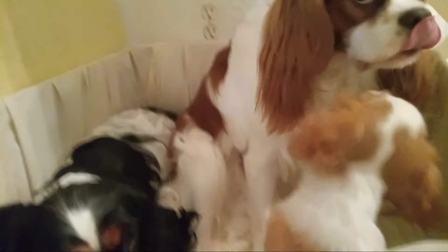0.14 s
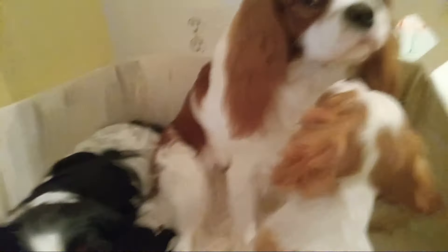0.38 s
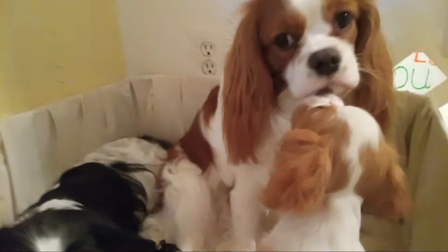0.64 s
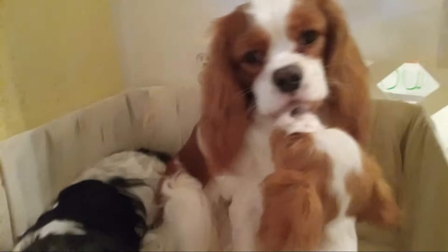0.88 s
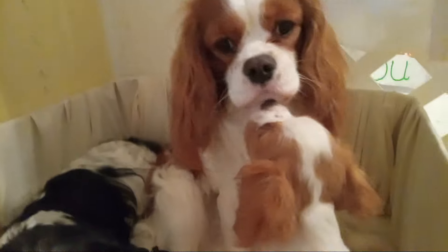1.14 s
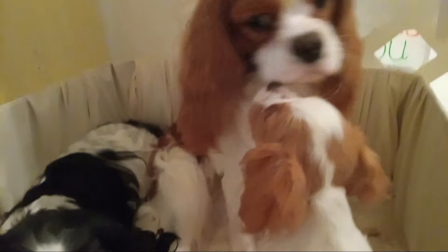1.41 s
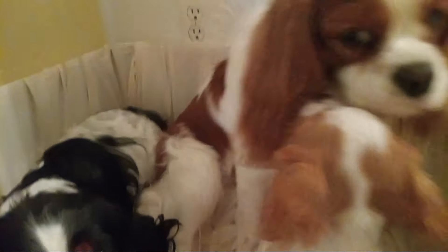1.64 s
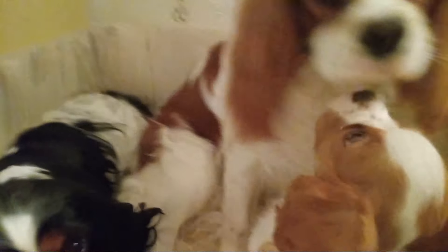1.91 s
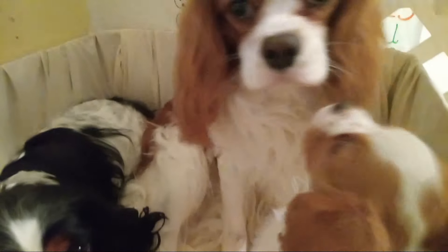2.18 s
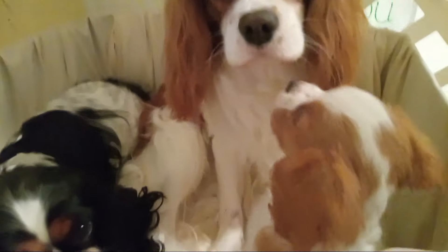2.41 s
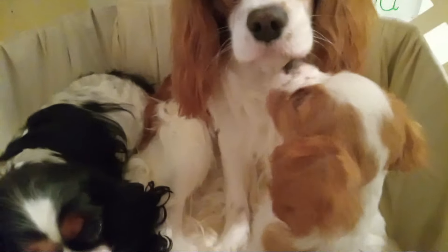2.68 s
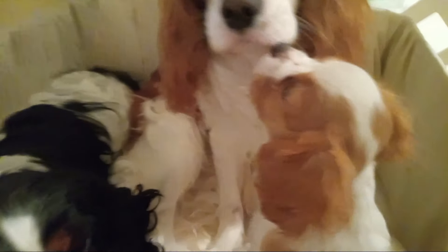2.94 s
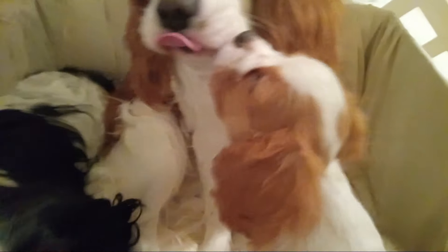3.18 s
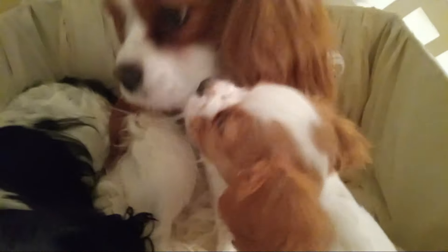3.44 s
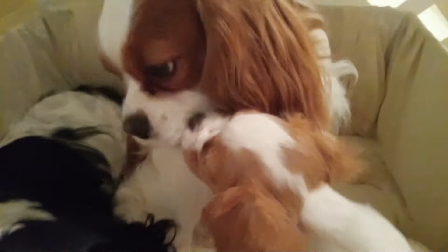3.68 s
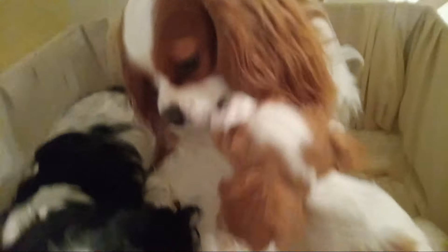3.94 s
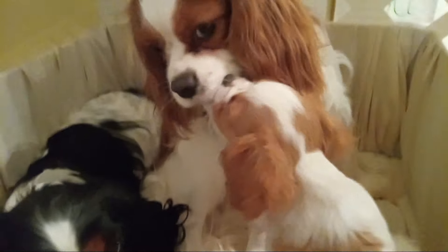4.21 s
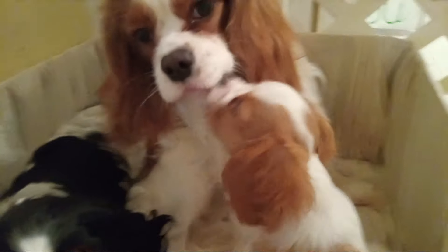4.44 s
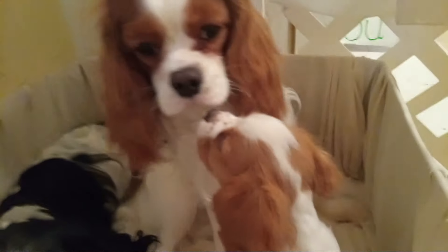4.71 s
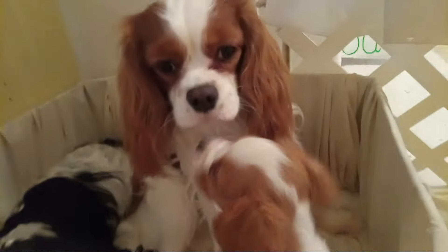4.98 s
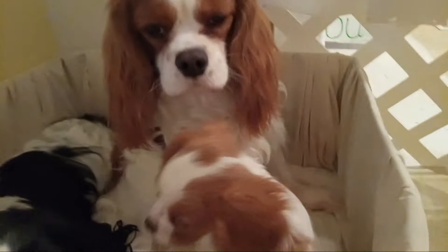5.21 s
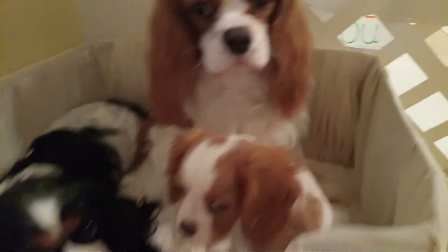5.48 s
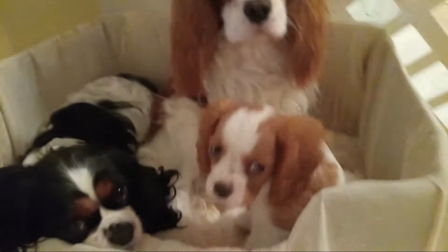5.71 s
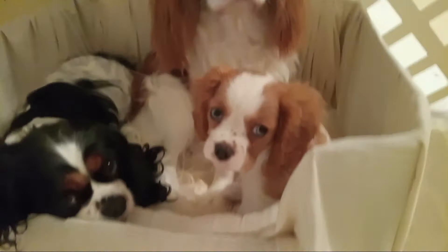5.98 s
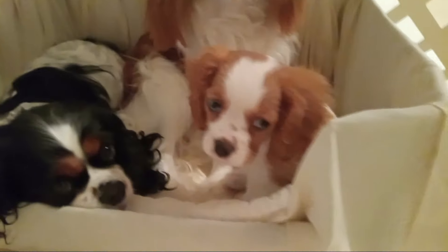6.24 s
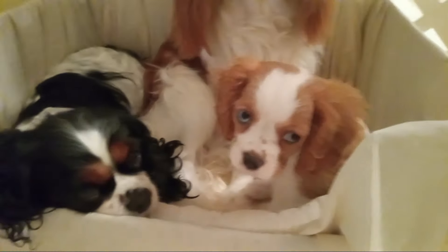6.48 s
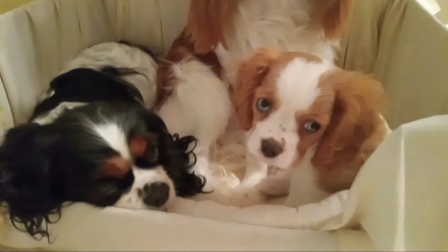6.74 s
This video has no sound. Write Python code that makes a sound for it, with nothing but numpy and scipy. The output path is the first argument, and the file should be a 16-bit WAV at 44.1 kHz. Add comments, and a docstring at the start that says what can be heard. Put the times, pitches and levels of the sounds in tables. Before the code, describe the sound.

Close inside a padded basket in a quiet room, dogs shift and scuff against cloth. A sharp scuff comes at the start, then fine wet licking ticks with soft paw thumps, a thin falling nose whistle and a lull. More licking and scuffs follow, then hard thumps and a coarse bedding rustle near the end, fading to small ticks. The left side is near and muffled, the right faint and open.

```python
"""Puppies scrabble in a fabric-lined basket: left port close against the bedding, right port open to the quiet room.
From 0 s paws thump the padded floor (damped pushes); ticks, scuffs and low woody knocks sound (band-passed noise
bursts), the loudest scuff at 0.19 s; bedding rustles (fibre-snap noise), weight shifts rumble. Licking crackles in
spells at 0.9-3.3 s (random clicks), a thin nose whistle slides down at 1.8-2.2 s (swept sine), soft snuffles come
at 4.1, 4.9 and 6.5 s (swelling noise); the hardest thumps and drags fall at 4.5-6 s. Ends at 6.87 s."""
import sys
import numpy as np
from scipy import signal
from scipy.fft import rfft, irfft
from scipy.io import wavfile
from scipy.ndimage import uniform_filter1d

SR = 44100
rng = np.random.default_rng(int(sys.argv[2]) if len(sys.argv) > 2 else 0)


def undo_db(level):
    """Turn decibels back into plain size, where 20 dB means ten times bigger."""
    steps = np.asarray(level, float) / 20
    return 10 ** steps


def output_pcm(signal):
    """Save a mono or channel-first signal as 16-bit PCM at the path in sys.argv[1].

    Samples are clipped to [-1, 1] before scaling.
    """
    pcm = np.clip(np.atleast_2d(signal).T, -1, 1) * 32767
    wavfile.write(sys.argv[1], SR, np.round(pcm).astype(np.int16))


N = 302869


def band(x, low_hz, high_hz, order=2):
    """Butterworth band-pass."""
    edges_hz = [low_hz, np.clip(high_hz, low_hz * 1.05, 0.45 * SR)]
    return signal.sosfilt(signal.butter(order, edges_hz, "band", fs=SR, output="sos"), x)


def octave_band(x, hz, octaves):
    """Band-pass centred on hz, octaves wide."""
    return band(x, hz / 2 ** (octaves / 2), hz * 2 ** (octaves / 2))


def rms_one(x):
    """Scale to rms 1."""
    return x / np.sqrt(np.mean(x ** 2) + 1e-20)


def in_time(rows):
    """Table columns interpolated to one value per sample."""
    t_s, *columns = np.transpose(rows)
    return [np.interp(np.arange(N) / SR, t_s, column) for column in columns]


def drift(corner_hz):
    """Slow random wander of rms 1: noise through two equal poles at corner_hz, made at SR / 20."""
    pole = np.exp(-2 * np.pi * corner_hz * 20 / SR)
    noise = rng.standard_normal(N // 20 + 2002)
    slow = signal.lfilter([1], [1, -2 * pole, pole * pole], noise)[2000:]   # settling dropped
    return np.interp(np.arange(N) / 20, np.arange(len(slow)), rms_one(slow))


def coloured(points):
    """Noise whose density follows a (f/Hz, density/dB per Hz) table."""
    hz = np.fft.rfftfreq(N, 1 / SR) + 1
    table_hz, table_db = np.transpose(points)
    density_db = np.interp(np.log(hz), np.log(table_hz), table_db)
    return irfft(rfft(rng.standard_normal(N)) * undo_db(density_db) * np.sqrt(SR / 2), N)


def resonate(x, resonances):
    """Chain of peaking filters from (f/Hz, width/Hz, boost/dB) rows."""
    for hz, width_hz, boost_db in resonances:
        w = 2 * np.pi * hz / SR
        a = np.sqrt(undo_db(boost_db))
        d = np.sin(w) * width_hz / hz / 2
        middle = -2 * np.cos(w)
        x = signal.lfilter([1 + d * a, middle, 1 - d * a], [1 + d / a, middle, 1 - d / a], x)
    return x


def add(out, start, x):
    """Mix x into out from sample start, cropped to out."""
    skip = max(-start, 0)
    part = x[..., skip:N - start]
    out[..., start + skip:start + skip + part.shape[-1]] += part


def swells(start_s, hold_s, level_db, rise_db_per_s, fall_db_per_s):
    """dB of one event per sample: steady rise to its start, hold, steady fall."""
    t = np.arange(N) / SR
    rise_db = rise_db_per_s * np.maximum(start_s - t, 0)
    fall_db = fall_db_per_s * np.maximum(t - start_s - hold_s, 0)
    return level_db - rise_db - fall_db


# steady room tone and self-noise per port: (f/Hz, density/dB per Hz)
NEAR_ROOM = [(40, -104), (150, -102), (500, -108), (1200, -110), (2200, -108), (4000, -116), (7000, -122),
             (9500, -134), (12000, -140), (15000, -135)]
FAR_ROOM = [(40, -110), (150, -109), (500, -116), (1200, -119), (2500, -122), (6000, -122), (7700, -130),
            (9500, -126), (10400, -129), (11000, -136), (13800, -136), (14700, -123), (15600, -123)]


def room_tone():
    """Steady coloured noise, independent at the near and far port."""
    return np.array([coloured(NEAR_ROOM), coloured(FAR_ROOM)])


# soft hiss at the far port, from rustling nearby and in the open: (t/s, level/dB)
FAR_HISS = [(0, -73.5), (.25, -73), (.5, -80), (1.0, -81.5), (1.65, -78), (1.9, -82), (2.5, -94.5),
            (2.95, -98.5), (3.25, -79.5), (3.5, -90), (3.9, -81.5), (4.3, -80.5), (4.6, -83.5), (4.98, -80),
            (5.04, -72.5), (5.22, -73), (5.3, -79.5), (5.8, -78.5), (6.3, -83.5), (6.87, -90.5)]


def far_hiss(mean_treble_db=-86, treble_share=0.68):
    """Rustling nearby and in the open, at the far port: wide soft hiss plus a treble band with a share of its swing."""
    middle_db, = in_time(FAR_HISS)
    treble_db = mean_treble_db + treble_share * (middle_db - middle_db.mean())
    middle = rms_one(band(rng.standard_normal(N), 1100, 4900, order=1)) * undo_db(middle_db)
    treble = rms_one(band(rng.standard_normal(N), 7970, 10270, order=3))
    return middle + treble * undo_db(treble_db + 0.4 * drift(30))


# weight shifting on the basket floor: (start t/s, hold/s, relative level/dB)
WEIGHT_SHIFTS = [(0, 0.26, -71), (0.816, 0.091, -78), (1.45, 0.62, -83), (2.728, 0.54, -75.5),
                 (3.176, 0.054, -73), (3.508, 0.37, -75.5), (4.133, 0.23, -75.5), (4.464, .04, -64.5),
                 (4.99, 0.34, -64.5), (5.534, 0.028, -67), (5.775, 0.057, -56), (6.1, 0.85, -81.5)]


def rumble(rise_db_per_s=157, fall_db_per_s=104, resting_relative_db=-89, gain_db=7.0, lump_db=7.5):
    """Lumpy low noise as weight shifts on the basket floor."""
    events_db = [swells(*row, rise_db_per_s, fall_db_per_s) for row in WEIGHT_SHIFTS]
    level_db = np.maximum(np.max(events_db, axis=0), resting_relative_db) + gain_db
    low = rms_one(band(rng.standard_normal(N), 41, 152))
    return low * undo_db(level_db + lump_db * drift(27.7))


# soft snuffles: (crest t/s, level/dB, length/s, f/Hz)
SNUFFLE_BREATHS = [(4.07, -59, 0.065, 1680), (4.934, -54.5, 0.14, 1740), (6.532, -56.5, 0.043, 1770)]


def snuffles(octaves=0.54, far_relative_db=-30):
    """Air through a dog's nose: narrow noise that swells and fades."""
    t = np.arange(N) / SR
    noise = rng.standard_normal(N)
    out = 0
    for crest_s, level_db, length_s, hz in SNUFFLE_BREATHS:
        swell = np.exp(-((t - crest_s) / length_s) ** 2)
        out = out + undo_db(level_db) * swell * rms_one(octave_band(noise, hz, octaves))
    return out * undo_db(np.array([[0], [far_relative_db]]))


# pitch of the nose whistle: (t/s, f/Hz)
WHISTLE_PITCH = [(1.78, 6266), (1.904, 6099), (1.95, 6164), (1.982, 5795), (1.998, 5835), (2.034, 5511),
                 (2.088, 5302), (2.172, 5413), (2.2, 5234)]


def whistle(near_mean_db=-69, far_mean_db=-78.5, facing_db=6, turn_s=2.01, turn_takes_s=0.1, edge_s=0.025, waver_db=2.5):
    """Thin wavering tone from a narrow nostril, turning from the near port to the far one."""
    hz, = in_time(WHISTLE_PITCH)
    t = np.arange(N) / SR
    phase = 2 * np.pi * np.cumsum(hz * (1 + 0.0019 * drift(60))) / SR
    start_s, end_s = WHISTLE_PITCH[0][0], WHISTLE_PITCH[-1][0]
    sounding = np.clip(np.minimum(t - start_s, end_s - t) / edge_s, 0, 1)
    turn_db = facing_db * np.clip(2 * (turn_s - t) / turn_takes_s, -1, 1)
    ports_db = np.array([near_mean_db + turn_db, far_mean_db - turn_db])
    return np.sin(phase) * sounding * undo_db(ports_db + waver_db * drift(26))


# spells of licking: (start t/s, hold/s, level/dB)
LICK_SPELLS = [(.92, .09, -66), (1.37, .08, -65), (1.6, .11, -64), (2.78, .15, -72), (3.03, .28, -68)]


def licking(clicks_per_s=160, mouth_hz=3550, mouth_octaves=0.49, size_db=2.5, edge_db_per_s=300, wide_db=-12):
    """Fine wet crackle: random clicks ring the mouth briefly."""
    level_db = np.max([swells(*row, edge_db_per_s, edge_db_per_s) for row in LICK_SPELLS], axis=0)
    sizes = undo_db(size_db * np.minimum(rng.exponential(1, N), 4)) * rng.choice([-1, 1], N)
    clicks = sizes * (rng.random(N) < clicks_per_s / SR) + 1e-18
    ring = rms_one(octave_band(clicks, mouth_hz, mouth_octaves))
    wide = rms_one(band(clicks, 2700, 11200))
    return undo_db(level_db) * (ring + undo_db(wide_db) * wide)


# air pocket between bedding and near port: (t/s, f/Hz)
POCKET_PITCH = [(0, 6130), (1.5, 6600), (3.2, 6740), (4.3, 6900), (4.5, 7400), (4.72, 7700), (4.9, 7000),
                (5.1, 6800), (5.3, 6100), (5.43, 5740), (5.52, 4730), (5.68, 4860), (5.78, 6200),
                (5.9, 6500), (6.05, 6100), (6.35, 7000), (6.55, 6260), (6.87, 6800)]


def pocket(x, q=1.744, block=256):
    """Air pocket at the near port: resonant low-pass whose pitch moves block by block."""
    hz, = in_time(POCKET_PITCH)
    out, state = np.zeros(N), np.zeros(2)
    for i in range(0, N, block):
        w = 2 * np.pi * hz[i] / SR
        c, d = np.cos(w), np.sin(w) / (2 * q)
        numerator, denominator = [(1 - c) / 2, 1 - c, (1 - c) / 2], [1 + d, -2 * c, 1 - d]
        out[i:i + block], state = signal.lfilter(numerator, denominator, x[i:i + block], zi=state)
    return out


# rustle bands: (low f/Hz, high f/Hz, crackle/dB, stirring offset/dB, drag offset/dB)
CLOTH_BANDS = [(259, 1037, 1.5, -7.5, -2.3), (1403, 2505, 0.52, 3, -3.7), (2930, 3710, 3, -6.4, -13.5),
               (4800, 12100, 1.36, -6.5, -6)]
# stirring in the bedding: (t/s, level/dB, brightness/dB per octave)
STIRRING = [(0.0, -57.5, 4.7), (0.13, -67.5, 4), (0.32, -67.5, 4), (0.63, -70.5, 0.7), (1.53, -66.5, -0.8),
            (2.07, -70.5, 0.5), (2.41, -78, 1.4), (2.81, -86.5, 5.5), (3.42, -71, 3.5), (3.73, -79, 7.3),
            (3.94, -72.5, 3.8), (4.15, -69, 1.3), (4.49, -77, 4.8), (4.73, -69.5, 2.7), (4.86, -69.5, 5.3),
            (4.97, -70, 8.6), (5.22, -52, 5.4), (5.53, -63, -3.5), (5.89, -61, 9), (6.02, -71.5, 9),
            (6.14, -68, 3.5), (6.56, -71, 3.7), (6.71, -76, 1), (6.87, -72, -0.5)]
# bedding dragged past the near port: (start t/s, hold/s, level/dB, weight/dB, brightness/dB per octave)
BEDDING_DRAGS = [(0, 0.0066, -50, -4, -15), (.06, 0.032, -62, 6.5, 2), (0.218, 0.087, -56, -25, -0.7),
                 (4.468, 0.0072, -49.5, 6, -0.5), (4.478, 0.047, -58, 8, 0.5),
                 (4.855, 0.018, -54, 2.5, -21), (4.964, 0.091, -53, -1, -20), (5.022, 0.041, -44.5, 9, 1.5),
                 (5.088, .03, -36, -3, -2), (5.139, 0.058, -41.5, 1.5, -2.5),
                 (5.227, 0.099, -47, -4.5, -0.5), (5.368, 0.087, -46.5, -27, -1.5),
                 (5.483, 0.061, -47, -25, -1.5), (5.548, 0.09, -48.5, 1, -4.5),
                 (5.63, 0.15, -51.5, -30, -15), (5.734, 0.068, -41, 1, -0.5),
                 (5.794, .05, -40.5, -0.5, -0.5), (5.844, 0.035, -30.5, -4, 1.75),
                 (5.918, 0.058, -36, -4.5, 2), (5.982, 0.062, -45, -1, 1.4), (6.188, 0.031, -45, -4, 0.5),
                 (6.112, .05, -67, -1.5, -6), (6.465, 0.088, -62, 0, 1), (6.564, .03, -62, 3.5, -7),
                 (6.723, 0.048, -55.5, 5.5, 1)]


def rustle_levels(rise_db_per_s=2204, fall_db_per_s=1405, ease_s=0.052, pivot_hz=1900):
    """dB per band: stirring and drag powers add; brightness tilts about the pivot, weight lifts the lowest band."""
    stir_db, stir_tilt_db = in_time(STIRRING)
    drag_powers = []
    for start_s, hold_s, level_db, *_ in BEDDING_DRAGS:
        slower = 1 + hold_s / ease_s   # longer drags rise and fall more slowly
        drag_db = swells(start_s, hold_s, level_db, rise_db_per_s / slower, fall_db_per_s / slower)
        drag_powers.append(undo_db(drag_db) ** 2)
    levels_db = []
    for low_hz, high_hz, _, stir_offset_db, drag_offset_db in CLOTH_BANDS:
        octaves_up = np.log2(np.sqrt(low_hz * high_hz) / pivot_hz)
        power = undo_db(stir_db + stir_offset_db + stir_tilt_db * max(octaves_up, 0)) ** 2
        for (*_, weight_db, tilt_db), drag_power in zip(BEDDING_DRAGS, drag_powers):
            colour_db = weight_db if octaves_up < -1 else tilt_db * octaves_up
            power = power + drag_power * undo_db(drag_offset_db + colour_db) ** 2
        levels_db.append(10 * np.log10(power))
    return levels_db


# resonances of the sliding cloth: (f/Hz, width/Hz, boost/dB)
CLOTH_MODES = [(1256, 61, 2.26), (1805, 77, 3), (2350, 88, 2.5), (3160, 100, 5), (3750, 48, 0.9),
               (4380, 1170, -2.5)]


def rustle(grain_db=3.5, slip_db=1.5, quiet_db=-62, loud_db=-40, top_db=-12):
    """Dense fibre snaps in stick-slip clumps; rougher as the second band gets louder."""
    levels_db = rustle_levels()
    rough = np.clip((levels_db[1] - quiet_db) / (loud_db - quiet_db), 0.1, 1)
    snap_sizes = undo_db(rough * grain_db * np.minimum(rng.exponential(1, N), 6))
    snaps = snap_sizes * rng.standard_normal(N)
    snaps = snaps * undo_db(rough * slip_db * drift(95))
    snaps = snaps / np.sqrt(uniform_filter1d(snaps ** 2, size=2500))   # level it; the bands set the loudness
    cloth = 0
    for (low_hz, high_hz, crackle_db, *_), level_db in zip(CLOTH_BANDS, levels_db):
        grains = rms_one(band(snaps, low_hz, high_hz, order=3))
        cloth = cloth + grains * undo_db(level_db + crackle_db * drift(27))
    top = undo_db(levels_db[-1] + top_db) * band(snaps, 7000, 16000, order=1)
    return pocket(pocket(resonate(cloth, CLOTH_MODES))) + top


def bursts(rows, octaves, skirt_db=-17, trail_db=-27, trail_t60_s=0.11, snap_db=6.0, snap_s=0.0028):
    """Noise burst that swells and dies; a wide skirt surrounds its band; short ones open with a snap."""
    out, lead = np.zeros((2, N)), 1323   # samples ahead of the crest
    t = (np.arange(5000) - lead) / SR
    noise = rng.standard_normal((len(rows), 2, len(t)))
    for (start_s, near_db, far_db, hz, ms), (core_noise, skirt_noise) in zip(rows, noise):
        length_s = max(ms, 0.3) / 1000
        swell = np.where(t < 0, np.exp(-(t / (0.2 * length_s)) ** 2), np.exp(-t / (0.63 * length_s)))
        trail = (t > 0) * undo_db(trail_db - 60 * np.abs(t) / trail_t60_s)
        swell = 0.5 * (swell + trail)
        snap = octave_band((t == 0) + 1e-18, hz, octaves)
        snap = snap / np.abs(snap).max() * undo_db(snap_db) * np.exp(-length_s / snap_s)
        core = rms_one(octave_band(core_noise, hz, octaves))
        core = core * np.sqrt(np.sum(swell ** 2) / np.sum((swell * core) ** 2))   # equal energy under the swell
        near = core + undo_db(skirt_db) * rms_one(band(skirt_noise, 1000, 18000, order=1))
        far = core + undo_db(skirt_db + 11.5) * rms_one(band(skirt_noise, 1500, 21000, order=1))
        sound = swell * np.array([near, far]) + snap
        add(out, round(start_s * SR) - lead, undo_db(np.array([[near_db], [far_db]])) * sound)
    return out


# resonant ticks, low woody knocks, rings that go with the thumps: (t/s, near level/dB, far level/dB, f/Hz, length/ms)
NARROW_BURSTS = [(0.015, -36.5, -61, 2460, 33), (.022, -42, -73.5, 717, 1.6),
                 (0.157, -41.5, -69, 6500, 1.8), (0.303, -36, -81, 3530, 2.1), (0.398, -28, -69, 5820, 2),
                 (0.869, -47, -64, 3600, 14), (0.919, -45, -72, 3420, 2.9), (.945, -46, -74, 3120, 11),
                 (.975, -42, -71, 3850, 16), (1.172, -35, -44.5, 3750, 10), (1.238, -50.5, -81, 7400, 3.3),
                 (1.344, -45, -73, 3600, 11), (1.404, -37, -61, 3840, 9), (1.421, -43, -58, 3800, 13),
                 (1.475, -51, -77, 3860, 9.1), (1.541, -46, -77, 4570, 5.5), (1.596, -32, -74, 3700, 3.9),
                 (1.652, -40, -65, 2900, 1.9), (1.663, -39.5, -78, 3040, 15), (1.76, -45.5, -67, 3340, 19),
                 (1.861, -44, -82, 2950, 8.4), (1.908, -50, -86, 3280, 2.5), (2.794, -43.5, -88, 3600, 5.2),
                 (2.893, -43, -82, 3630, 7.4), (2.975, -54, -90, 3260, 7.3), (2.997, -42, -73, 3500, 11),
                 (3.055, -45, -87, 3720, 10), (3.081, -42, -54.5, 2000, 3.6), (3.092, -46, -70, 3600, 8.8),
                 (3.15, -46, -85, 3600, 4.0), (3.187, -40.5, -69, 3420, 24), (3.233, -47, -61, 5930, 25),
                 (3.246, -45.5, -73, 3600, 12), (3.59, -44.5, -60, 590, 5.5), (3.683, -49, -63, 1010, 5.1),
                 (3.757, -54, -83, 3600, 6.4), (3.833, -45.5, -58, 3900, 4.7), (4.177, -51, -84, 790, 17),
                 (4.185, -48, -55, 6900, 3.4), (4.334, -20.5, -47, 3720, 2), (4.354, -28, -54, 3600, 4.4),
                 (4.387, -71, -65, 9600, 10), (4.405, -45, -79, 3350, 1.8), (4.46, -35.5, -60, 3600, 38),
                 (4.46, -37.5, -51.5, 782, 36), (4.462, -34, -61, 7440, 42), (4.648, -31.5, -70, 8000, 50),
                 (4.65, -43.5, -54, 3700, 32), (4.711, -40, -61, 3550, 13.5),
                 (4.818, -32.5, -50.5, 3590, 7.6), (4.818, -30.5, -59, 765, 5), (5.502, -30, -76, 743, 3.9),
                 (5.394, -29, -70, 3000, 6.9), (5.414, -31, -64, 3060, 2.9), (5.461, -23, -61, 2960, 3.3),
                 (5.63, -46, -80, 5470, 3.0), (5.554, -63, -68.5, 8950, 27), (6.119, -50.5, -67, 1540, 4.3),
                 (6.202, -36, -86, 6500, 5.3), (6.337, -46.5, -90, 1830, 18), (6.409, -43, -61, 2010, 6.4),
                 (6.609, -25.5, -46.5, 5170, 0.99), (6.667, -47, -95, 1980, 4.2)]
# wide noise bursts, scuffs on cloth and low woody knocks: (t/s, near level/dB, far level/dB, middle f/Hz, length/ms)
WIDE_BURSTS = [(.049, -30.5, -74, 4550, 8.4), (.067, -22, -51, 3800, 0.7), (.092, -49, -63, 3270, 4.8),
               (.168, -32.5, -78, 4800, 8.8), (.191, -7.5, -32, 4100, 1.1), (.191, -33.5, -53, 2200, 4.7),
               (.223, -56, -40, 7540, 1.4), (.383, -37, -68, 2680, 10.5), (.44, -48.5, -72, 4270, 9.0),
               (.51, -47.5, -84, 2900, 19), (.561, -43.5, -83, 3140, 5.3), (.928, -46, -64, 2380, 11),
               (.971, -35, -57, 4150, 2.8), (.977, -51, -58, 650, 14), (1.174, -40, -57, 594, 14),
               (1.342, -65, -63, 617, 15), (3.592, -42.5, -70, 413, 22), (.991, -43.5, -73, 2690, 26),
               (1.032, -47.5, -61, 3900, 15), (1.063, -48, -66, 4000, 5.6), (1.17, -40.5, -48, 3240, 4.4),
               (1.338, -41, -57, 7800, 7.2), (1.685, -46.5, -65, 2360, 20), (1.7, -40, -58, 4800, 0.66),
               (1.877, -43.5, -73, 2730, 14), (2.624, -35, -74, 3100, 5.9), (2.664, -48, -90, 4170, 4.2),
               (2.7, -58, -90, 2700, 8.2), (2.768, -48, -85, 3960, 9.8), (2.837, -42.5, -88, 3980, 6.3),
               (2.927, -52, -86, 2600, 6.2), (3.029, -50, -76, 3880, 14), (3.166, -43.5, -62, 4630, 1.9),
               (3.393, -32, -47, 7000, 0.44), (3.406, -29.5, -43.5, 6100, 2.8), (3.559, -50, -70, 3400, 9),
               (3.575, -39.5, -77, 4860, 38), (3.591, -33, -73, 4600, 18.3), (3.749, -36, -79, 6200, 16),
               (3.875, -64, -67, 8100, 46), (3.915, -52, -69, 6600, 3.7), (4.145, -35, -86, 5600, 8.4),
               (4.247, -56, -90, 3000, 14), (4.369, -39, -79, 4300, 16), (4.457, -31, -56, 2310, 6.4),
               (4.81, -36.5, -56, 2130, 31), (5.029, -29.5, -56.5, 2290, 43),
               (5.131, -20.5, -61, 1300, 2.6), (5.179, -26.5, -88, 2580, 8), (5.377, -36, -76, 2580, 8.4),
               (5.393, -22.5, -64, 2150, 3.9), (5.501, -16.5, -39.5, 3150, 3.5),
               (5.543, -35.5, -80, 2550, 14), (5.601, -39, -76, 840, 5), (5.624, -37.5, -67, 1710, 6.7),
               (5.745, -28.5, -78, 2700, 19), (5.85, -19, -79, 3200, 1.9), (5.871, -12, -83, 3300, 5.6),
               (5.909, -17, -55, 5100, 1.9), (5.917, -18.5, -72, 2400, 1.5), (5.955, -22, -72, 1820, 9.1),
               (6.054, -36, -83, 3100, 2.1), (6.305, -39.5, -66, 2880, 1), (6.456, -39.5, -90, 2360, 2.5),
               (6.495, -43, -57, 3600, 2.2), (6.597, -46, -89, 2800, 0.51), (6.734, -39, -87, 1900, 12),
               (6.763, -42, -88, 1620, 0.59)]


def contacts(narrow_octaves=0.24, wide_octaves=1.47, overtone_ratio=1.87, overtone_db=-14):
    """Narrow ticks, knocks and rings, each with a weaker overtone, and wide scuffs and knocks."""
    overtones = np.array(NARROW_BURSTS) * [1, 1, 1, overtone_ratio, 1] + [0, overtone_db, overtone_db, 0, 0]
    narrow = bursts(NARROW_BURSTS, narrow_octaves) + bursts(overtones, narrow_octaves / 2)
    return narrow + bursts(WIDE_BURSTS, wide_octaves)


# paw and body thumps: (t/s, near level/dB, far port softer by/dB, f/Hz, length/ms)
PAW_THUMPS = [(0.025, -45.5, -1, 380, 7.3), (0.051, -41, 29, 96.6, 7.2), (0.113, -58, 24, 76, 86),
              (0.178, -53, 20, 73, 30), (0.308, -48.5, 18, 99, 21), (0.387, -48.5, 28, 103, 11),
              (0.515, -44, 31, 103, 2.5), (0.573, -48, 26, 94, 23), (0.978, -25, 10, 144, 10.5),
              (1.011, -51.5, 5, 80.4, 26), (1.174, -21, 9.5, 174, 9), (1.206, -43.5, 10, 75.6, 17),
              (1.233, -53, 7, 130, 21), (1.345, -25, 11, 171, 8.9), (1.885, -38, 47.5, 158, 4.4),
              (2.633, -35.5, 34, 98, 4.8), (2.669, -40, 30, 115, 4.2), (2.705, -51, 21, 105, 23),
              (2.843, -48, 24, 83, 17), (3.096, -53, 27, 82, 38), (3.161, -53, 20, 66.6, 21),
              (3.196, -45, 24, 80, 13), (3.229, -61, 23, 101, 130), (3.292, -49, 23, 83, 15),
              (3.327, -44, 38, 110, 12), (3.526, -56, 5, 173, 28), (3.575, -43, 22, 102, 15),
              (3.595, -26.5, 29, 90, 7.6), (3.67, -42, 43, 104, 40), (3.766, -48, 35, 91, 45),
              (4.148, -29.5, 51, 116, 6.7), (4.181, -43, 32, 122, 4.3), (4.248, -41.5, 22, 96, 2.4),
              (4.269, -55, 24, 124, 11), (4.463, -26, 9.5, 181, 11.4), (4.487, -23.5, 10.5, 232, 3.1),
              (4.647, -15, 21.5, 158, 8.5), (4.714, -34, 7.5, 166, 6.1), (4.816, -16.5, 6, 191, 7.1),
              (4.858, -36, 21, 200, 4.2), (5.047, -17, 9.5, 247, 5.9), (5.082, -30, 11, 229, 46),
              (5.136, -19.5, 8, 282, 5.4), (5.16, -34.5, 10, 230.6, 67), (5.258, -36.5, 15, 336, 4.1),
              (5.298, -43, 20, 310, 15), (5.371, -45, 25, 477, 9.8), (5.435, -48, 41, 101, 9.8),
              (5.504, -15, 70, 144, 3.8), (5.542, -57, 41, 268, 14), (5.574, -34.5, 50, 297, 8),
              (5.601, -17, 48, 188, 1.74), (5.685, -25.5, 40, 155, 6.9), (5.754, -38, 37, 390, 13),
              (5.779, -31.5, 24, 232, 12), (5.852, -23.5, 57, 376, 4.5), (5.929, -35.5, 42, 129, 10.6),
              (5.973, -42, 33, 383, 31), (5.998, -47, 40, 380, 47), (6.026, -45.5, 40, 316, 5.9),
              (6.725, -50.5, 41, 81, 21), (6.766, -60, 24, 345, 24)]
# resonances of the basket wall: (f/Hz, width/Hz, boost/dB)
WALL_MODES = [(406, 44, -10), (606, 91, 24), (787, 53, 10), (940, 57, -2), (1330, 99, 24.5)]


def thumps(ring_db=-19, ring_t60_s=0.24, slap_db=-20, slap_t60_s=0.057, knock_db=-16, knock_t60_s=0.15, muffle_ratio=1.28):
    """Padded push of a cycle or two; basket rings on, wall knocks and slaps, less for weight right at the port."""
    out, lead = np.zeros((2, N)), 1764   # samples ahead of the push
    t = (np.arange(9000) - lead) / SR
    noise = rng.standard_normal((len(PAW_THUMPS), 2, len(t)))
    for (start_s, level_db, softer_db, hz, ms), (ring_noise, wall_noise) in zip(PAW_THUMPS, noise):
        spread_s = ms / 2700
        push = np.exp(-0.5 * (t / spread_s) ** 2) * -np.cos(2 * np.pi * hz * t + 0.83)
        since_s = np.maximum(t + 3.1 * spread_s, 0)
        ring = rms_one(band(ring_noise, 0.42 * hz, 1.346 * hz)) * undo_db(ring_db - 60 * since_s / ring_t60_s)
        slap = undo_db(slap_db - 60 * since_s / slap_t60_s)
        knock = undo_db(knock_db - 60 * since_s / knock_t60_s)
        wall = rms_one(resonate(band(wall_noise, 380, 1900), WALL_MODES))
        wall = wall * (slap + knock) * undo_db(-muffle_ratio * softer_db)
        sound = push + ring * np.minimum(since_s / spread_s, 1) + wall * np.minimum(since_s / 0.0016, 1)
        add(out, round(start_s * SR) - lead, undo_db(level_db) * sound * undo_db(np.array([[0], [-softer_db]])))
    return out


# port resonances: (f/Hz, width/Hz, boost/dB)
NEAR_PORT_MODES = [(3600, 570, 4), (4800, 4000, -7), (6900, 1820, 15)]
FAR_PORT_MODES = [(5560, 400, 13.5), (9460, 1400, 17.5), (12400, 2100, -19), (15000, 1400, 8)]


def through_ports(x):
    """Peaking resonances of the two port openings."""
    return np.array([resonate(x[0], NEAR_PORT_MODES), resonate(x[1], FAR_PORT_MODES)])


# treble let through the cloth over the near port: (t/s, level/dB)
CLOTH_COVER = [(0, -6.5), (1.5, -5.5), (2.4, -14.5), (3.4, -6), (4.16, -8.5), (4.3, -53), (5.5, -46),
               (6.87, -36)]


def muffle(x, top_db=-6, top_share=0.4):
    """Cloth over the near port: steep low-pass plus a varying treble band and a faint top resonance."""
    treble_db, = in_time(CLOTH_COVER)
    body = signal.sosfilt(signal.cheby2(7, 65, 9700, fs=SR, output="sos"), x)
    treble = undo_db(treble_db) * band(x, 7070, 10100, order=2)
    top = undo_db(top_db + top_share * treble_db) * band(x, 14400, 15800, order=3)
    return body + treble + top


def scene(near_lag_s=0.00105):
    """Sound arriving at the near (left) and far (right) port."""
    near, far = thumps() + whistle() + snuffles() + through_ports(contacts())
    near = muffle(near + licking() + rustle() + rumble())
    near = np.interp(np.arange(N) - near_lag_s * SR, np.arange(N), near)   # the padding delays the near side
    return np.array([near, far + far_hiss()]) + room_tone()


def low_pass(x):
    """Removes everything above the highest recorded frequency."""
    return signal.sosfilt(signal.butter(12, 16830, fs=SR, output="sos"), x)


def record(dry):
    """Bass and top roll-off of the small microphones."""
    no_bass = signal.sosfilt(signal.butter(3, 58, "high", fs=SR, output="sos"), dry)
    mix = signal.sosfilt(signal.ellip(10, 0.5, 60, 15750, fs=SR, output="sos"), no_bass)
    return low_pass(mix)


dry = scene()
out = record(dry)
output_pcm(out)
```